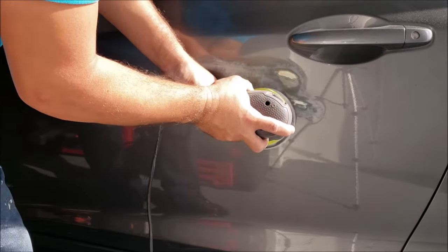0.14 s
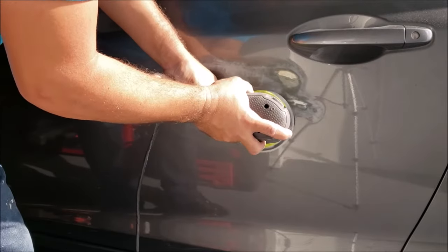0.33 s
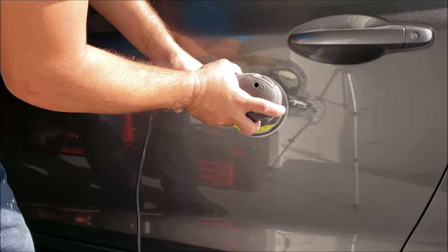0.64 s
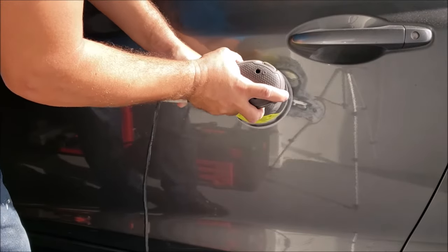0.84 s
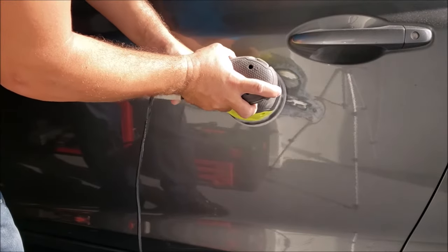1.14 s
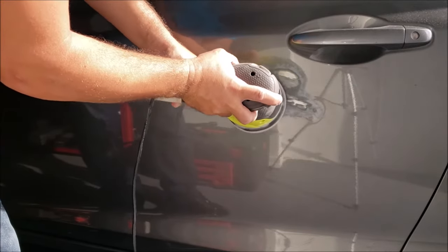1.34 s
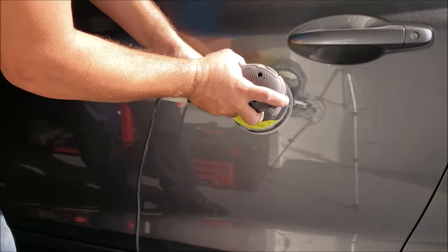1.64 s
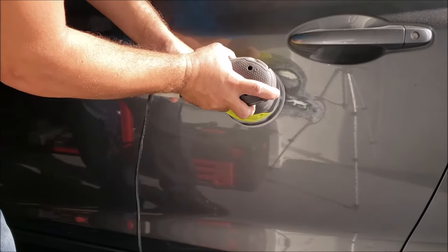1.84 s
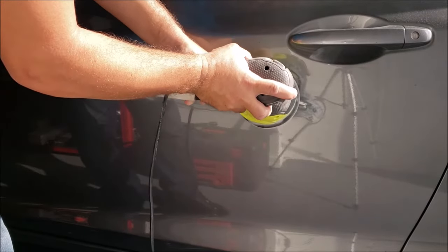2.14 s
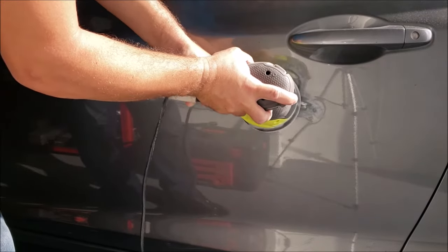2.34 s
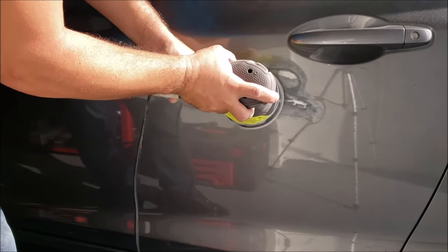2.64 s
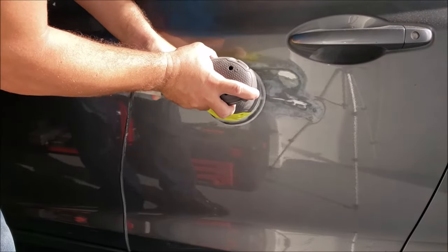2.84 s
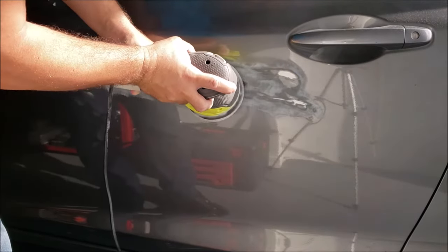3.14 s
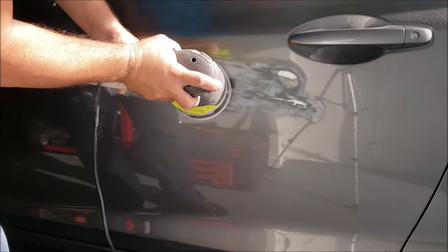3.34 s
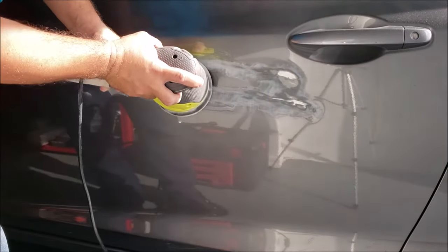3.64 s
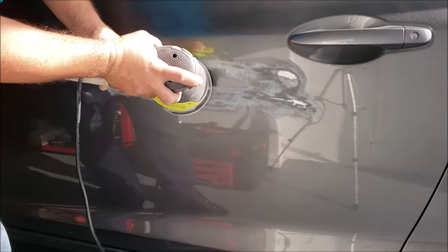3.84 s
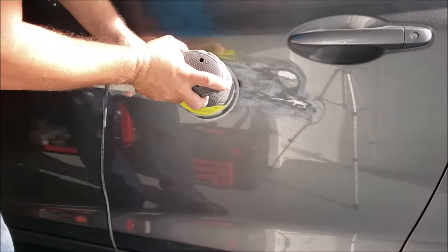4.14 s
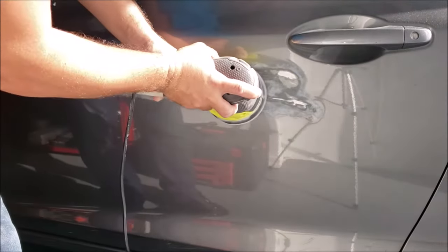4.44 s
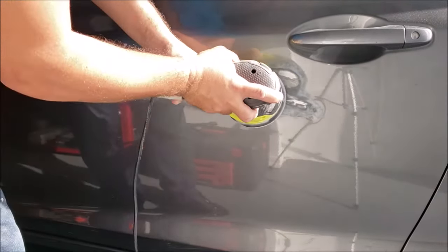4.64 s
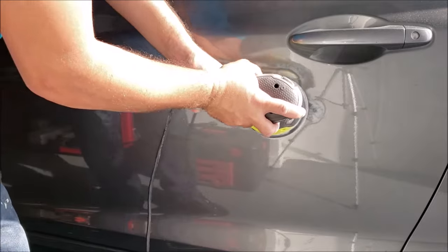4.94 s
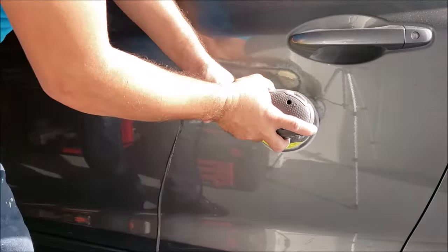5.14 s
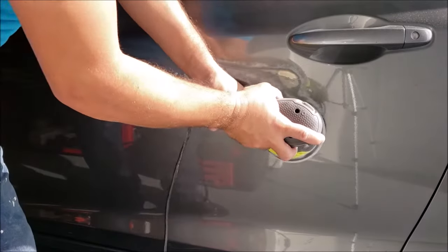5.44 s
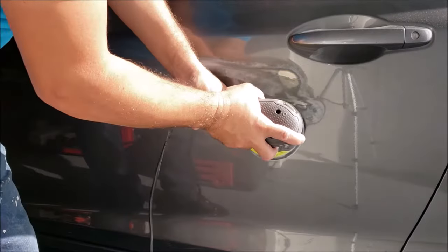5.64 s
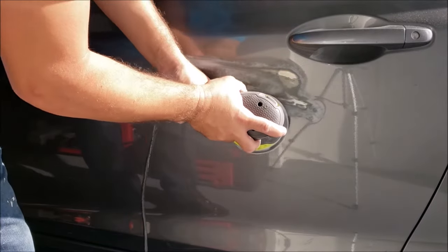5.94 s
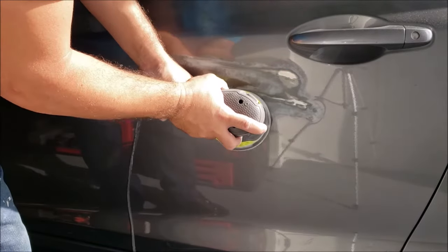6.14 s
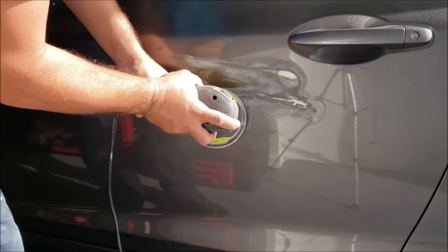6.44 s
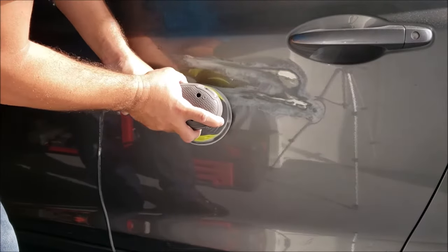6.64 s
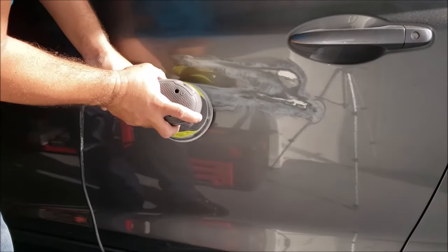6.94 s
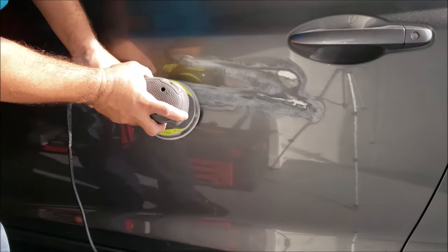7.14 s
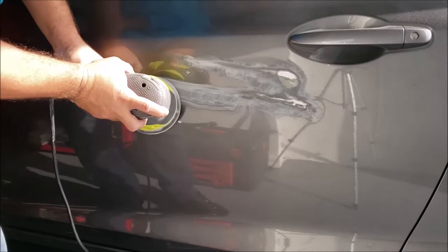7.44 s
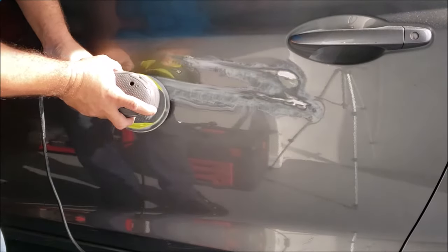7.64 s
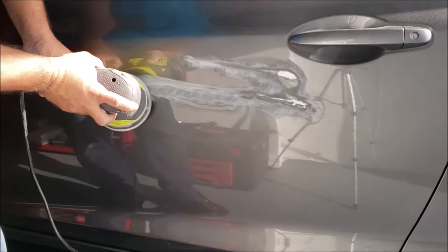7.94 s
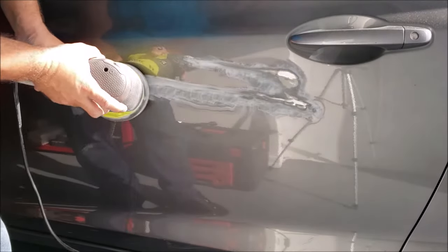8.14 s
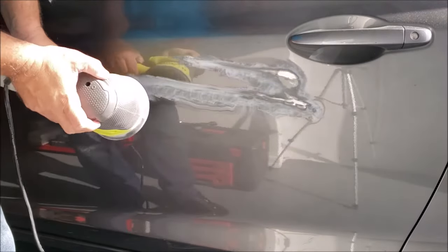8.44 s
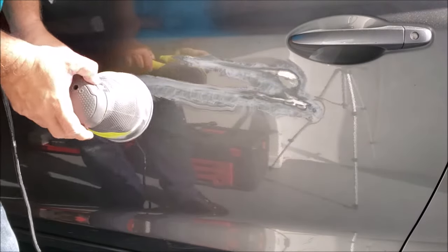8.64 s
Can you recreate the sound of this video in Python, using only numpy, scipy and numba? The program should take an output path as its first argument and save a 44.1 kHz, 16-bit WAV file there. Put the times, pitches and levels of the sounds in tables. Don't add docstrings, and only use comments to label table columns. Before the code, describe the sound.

A hand sander works on a painted metal panel, heard close in stereo with the tool leaning slightly left. Constant buzzing hum, metallic overtones that swell and fade, fan air and dry abrasive hiss continue throughout. Soft rhythmic knocks colour the first two seconds. After about eight seconds it leaves the door, sounding lighter and airier, pitch edging up before a final sag; a light breeze rumbles low.

```python
import sys
import numpy as np
from scipy import signal
from scipy.fft import rfft, irfft, next_fast_len
from scipy.io import wavfile
from scipy.ndimage import uniform_filter1d
from numba import njit

SR = 44100
rng = np.random.default_rng(int(sys.argv[2]) if len(sys.argv) > 2 else 0)


def attenuation_scalar(level_db):
    decades = np.asarray(level_db, float) / 20
    return 10 ** decades


def master(y):
    cut = np.clip(np.atleast_2d(y).T, -1, 1)
    pcm = np.round(cut * 32767)
    wavfile.write(sys.argv[1], SR, pcm.astype(np.int16))


N = 387626
SIZE = next_fast_len(N, True)
FREQ = np.maximum(np.fft.rfftfreq(SIZE, 1 / SR), 1)
STEP = 64
SLOW = np.arange(N // STEP + 2) * STEP / SR
SIDES = np.array([[.5], [-.5]])
LIFT_S, LIFT_FADE_S = 8.04, .06


def curves(table):
    s, *columns = np.transpose(table)
    return [np.interp(SLOW, s, c) for c in columns]


def colour(points, hz=FREQ):
    at, value = np.transpose(points)
    return np.interp(np.log(hz), np.log(at), value)


def fine(slow):
    return np.interp(np.arange(N) / SR, SLOW, slow)


def walk(rate):
    k = max(int(SR / STEP / rate), 1)
    held = rng.standard_normal(1000)[np.arange(len(SLOW)) // k]
    return 1.3 * uniform_filter1d(uniform_filter1d(held, k), k)


def plateau(start, length, edge_s):
    inside_s = np.minimum(SLOW - start, start + length - SLOW)
    return np.clip(.5 + inside_s / edge_s, 0, 1)


def bumps(table):
    return sum(height * np.exp(-((SLOW - s) / half) ** 2) for s, half, height in table)


@njit
def spin_out(angle, swing, step):
    out = np.empty((2, len(angle)))
    for i in range(len(angle)):
        j, part = i // step, (i % step) / step
        turn = np.exp(1j * angle[i])
        for side in range(2):
            now = swing[side, j] + part * (swing[side, j + 1] - swing[side, j])
            out[side, i] = (turn * now).imag
    return out


def tone(angle, db, lean_db, lead, drift=0):
    loss = np.abs(np.cosh(lean_db * np.log(10) / 40 + .5j * lead))
    size = np.sqrt(2) * attenuation_scalar(db + SIDES * lean_db) / np.maximum(loss, .5)
    swing = size * np.exp(1j * (SIDES * lead + drift))
    return spin_out(angle, swing, STEP)


def port_noise(gain, alike):
    common, differ = rfft(rng.standard_normal((2, SIZE)))
    alike = np.clip(alike, 0, 1)
    shared = np.sqrt(1 + alike) * common
    apart = 2 * SIDES * np.sqrt(1 - alike) * differ
    pair = gain * (shared + apart)
    return pair / np.std(irfft(pair.mean(axis=0), SIZE))


# (time [s], speed [Hz])
SHAFT_SPEED = [(0, 205.9), (.35, 206.5), (1.3, 206.3), (1.9, 205.2), (2.7, 204.6), (3.4, 204.8),
               (3.9, 205.5), (4.7, 204.7), (5.3, 206.6), (5.65, 207.1), (6.0, 206.4), (6.5, 205.4),
               (7.4, 205.7), (7.82, 205.5), (8.1, 207.5), (8.42, 210.1), (8.645, 210.8), (8.79, 197.5)]


def shaft_angle():
    speed_hz = curves(SHAFT_SPEED)[0] * (1 + 0.0007 * walk(10))
    return 2 * np.pi * np.cumsum(fine(speed_hz)) / SR


# (time [s], strength [1 = full knock])
PAD_KNOCKS = [
    (0.0, .7),
    (.27, 1),
    (.56, .75),
    (.8, 0.4),
    (1.03, 1.05),
    (1.3, 1.1),
    (1.55, 1.1),
    (1.9, 1),
    (2.1, .3),
    (2.3, .3),
]
KNOCK_CHANGE = {2: -6.5, 6: 1, 8: 16.5, 18: 5}


def knock_db(k):
    half_s = .08
    return KNOCK_CHANGE.get(k, 0) * bumps([(s, half_s, strength) for s, strength in PAD_KNOCKS])


# (time [s], length [s], multiple of the shaft, level [dB])
DOOR_ANSWERS = [(.75, 1.77, 3, -57), (2.85, .6, 3, -56.5), (3.4, 0.94, 3, -53), (4.35, 0.58, 3, -58),
                (5.2, 0.75, 3, -61.5), (6.3, 0.91, 3, -59), (8.2, 0.67, 3, -60), (-.1, 0.19, 4, -54),
                (.3, 1.2, 4, -56.5), (1.55, .7, 4, -61), (2.5, 0.53, 4, -61), (3.3, 0.81, 4, -57),
                (4.25, 0.36, 4, -65), (5.7, 0.61, 4, -62.5), (6.45, 0.6, 4, -58.5), (7.15, 0.58, 4, -58.5),
                (-.2, .32, 6, -51), (.22, 1.14, 6, -51.5), (1.45, 0.76, 6, -53.5), (2.55, .5, 6, -50),
                (2.3, .25, 6, -55.5), (3.3, 1.2, 6, -67), (4.3, .65, 6, -55.5), (5.0, .3, 6, -60),
                (5.65, 0.76, 6, -54.5), (6.4, .5, 6, -61)]
# (time [s], length [s], multiple of the shaft, level [dB])
RIM_RATTLES = [(-.1, 1.85, 2, -56.5), (1.92, .1, 2, -56.5), (2.15, 0.092, 2, -60), (2.75, 1.03, 2, -64),
               (3.95, .65, 2, -58.5), (4.65, .35, 2, -66), (5.5, 1.75, 2, -64), (7.6, .3, 2, -61),
               (8.0, .45, 2, -62), (8.68, 0.11, 2, -62), (2.45, 0.51, 8, -58.5), (3.95, 0.68, 8, -60),
               (4.9, .25, 8, -60), (5.9, .7, 8, -65), (8.4, 0.46, 8, -62.5), (-.1, 0.81, 9, -64),
               (.8, .77, 9, -59), (3.2, 0.95, 9, -65.5), (5.05, .25, 9, -65), (6.5, 0.92, 9, -67.5),
               (7.86, 0.23, 9, -61), (8.3, 0.27, 9, -64), (8.6, .3, 9, -60.5)]


def swell_db(k, rest_db):
    power = attenuation_scalar(rest_db) ** 2
    for start, length, multiple, db in list(DOOR_ANSWERS) + list(RIM_RATTLES):
        if multiple == k:
            power = power + attenuation_scalar(db) ** 2 * plateau(start, length, 0.23) ** 2
    return 10 * np.log10(power) + knock_db(k)


# (time [s], hum level [dB], left minus right [dB])
PANEL_HUM = [(0.0, -41.5, 4.6), (0.19, -44, 4.0), (.7, -42, 2.6), (1.3, -40.5, 2.5), (1.9, -42.5, 1.8),
             (2.47, -44, 2.4), (2.91, -39.5, 1.0), (4.21, -39.5, 0.5), (4.84, -44.5, 2.0), (5.34, -46, 5),
             (6.0, -43.6, 4.5), (6.75, -43, 4.5), (7.6, -41, 3.2), (7.84, -43, 3), (8.01, -51, 2.0),
             (8.35, -49.5, 3.7), (8.72, -53, 3), (8.79, -61, -2.5)]
# (multiple of the shaft, level [dB], change once lifted [dB])
STRONG_REST = [(2, -69, -6), (3, -64.5, 1.5), (4, -66, -9), (6, -66, -4), (8, -70, 1), (9, -69, -2)]
# (multiple of the shaft, left minus right [dB], left leads by [rad])
STRONG_STEREO = [(1, -0.5, 0.95), (2, 4, 0.4), (3, 6, 1), (4, 10.5, .6), (6, 5.5, -0.045), (8, 13, -2),
                 (9, 9, 1)]


def panel_hum_and_rim(angle):
    hum, pan_db = curves(PANEL_HUM)
    lifted = plateau(LIFT_S, 9, LIFT_FADE_S)
    levels = [hum]
    levels += [swell_db(k, db + lifted_db * lifted) for k, db, lifted_db in STRONG_REST]
    out = 0
    for db, (k, lean_db, lead) in zip(levels, STRONG_STEREO):
        if k > 1:
            lean_db = lean_db + 1.7 * walk(1.63)
            lead = lead + .3 * walk(1.2)
            flutter_db = 1.66 * walk(16) + .4 * walk(5)
            drift = k + 0.49 * walk(26)
        else:
            lean_db = lean_db + pan_db
            flutter_db = 0.35 * walk(11) + 0.4 * walk(45) + 0.26 * walk(4)
            drift = 0
        out = out + tone(k * angle, db + flutter_db, lean_db, lead, drift + 0.032 * walk(40))
    return out


# (frequency [Hz], left minus right [dB])
PORT_LEAN = [(60, 3), (200, 1), (380, 3), (700, 4), (1290, 5), (2380, 8), (6000, 11.5), (7300, 8),
             (7800, 6), (11700, 3.5), (12800, 5), (15700, 11)]
# (multiple of the shaft, level [dB])
WHINE_REST = [(5, -77), (7, -71.5), (10, -72.5), (11, -69), (12, -69), (13, -83), (14, -85), (15, -75.5),
              (16, -74), (17, -70), (18, -72), (19, -77), (20, -83), (21, -76), (22, -73), (23, -83),
              (24, -72), (25, -73.5), (27, -77.5), (28, -81), (29, -72.5), (31, -83), (36, -77), (47, -80),
              (48, -84)]
# (time [s], length [s], multiple of the shaft, level [dB])
DOOR_SINGS = [(-0.1, .68, 18, -62), (0.0, 0.89, 12, -65.5), (5.5, .6, 36, -70), (0.5, 2.34, 24, -63),
              (-0.5, 0.61, 48, -69), (0.58, 1.41, 10, -64), (2.0, 1.6, 17, -65.5), (2.5, 0.79, 14, -69),
              (2.7, 0.68, 12, -61.5), (2.51, 0.3, 7, -60), (2.5, .65, 5, -66), (2.95, 0.4, 21, -66),
              (3.25, 0.41, 24, -64), (3, 0.5, 22, -65), (3.5, 0.76, 19, -65), (3.5, 0.7, 14, -66),
              (3.5, 1.4, 7, -62.5), (5.5, .55, 5, -67), (4.35, 0.68, 17, -67), (4, 1.5, 18, -65.5),
              (6.5, 1.26, 5, -65), (5.5, 1.5, 17, -65.5), (5.5, 1.7, 14, -62), (5, 0.75, 10, -61),
              (6.5, .95, 13, -69), (7, .5, 15, -66), (6.4, 0.5, 11, -65), (7.3, 0.56, 19, -60.5),
              (7, 1.1, 18, -61.5), (7, 0.55, 21, -62)]
# (time [s], length [s], multiple of the shaft, level [dB])
FREE_MOTOR_SINGS = [(7.9, .2, 7, -58.5), (8.1, .2, 18, -67), (8.13, 0.26, 14, -63), (8.33, 0.27, 11, -60),
                    (8.1, .2, 11, -65), (8.3, 0.43, 21, -65), (8.38, .22, 16, -63), (8.35, .25, 10, -64),
                    (8.66, .1, 10, -61), (8.3, .25, 12, -66), (8.5, 0.39, 7, -58.5), (8.25, .4, 13, -66),
                    (8.35, .2, 20, -68), (7.9, .2, 15, -64)]
# (time [s], turn rate [Hz], throb depth [dB])
PAD_SPIN = [
    (0, 3.44, 2.2),
    (2.2, 3.35, 2),
    (3.5, 2.54, 1.2),
    (8.79, 3.1, 2.7),
]


def whine(angle):
    spin_hz, throb_db = curves(PAD_SPIN)
    spin = 2 * np.pi * np.cumsum(spin_hz) * STEP / SR
    out = 0
    for k, rest_db in WHINE_REST:
        power = attenuation_scalar(rest_db + 0.95 * walk(2.54)) ** 2
        for start, length, multiple, sing_db in list(DOOR_SINGS) + list(FREE_MOTOR_SINGS):
            if multiple == k:
                power = power + attenuation_scalar(sing_db - 3.5) ** 2 * plateau(start, length, 0.2)
        throb = throb_db * (np.cos(spin + 7 * rng.random()) - .3)
        db = 10 * np.log10(power) + throb + knock_db(k) + 2.52 * walk(14)
        lean_db = colour(PORT_LEAN, 206 * k) + 0.7 * walk(1.23)
        out = out + tone(k * angle, db, lean_db, 1.77 * walk(1.353), k + 1.06 * walk(9))
    return out


def reflections():
    lag_s = .001 + .02 * rng.random((2, 7, 1))
    treble = np.clip(FREQ / 4000 - .5, 0, 1)
    comb = 1 + attenuation_scalar(-13.0) * treble * np.exp(-2j * np.pi * FREQ * lag_s).sum(axis=1)
    return comb / np.sqrt(uniform_filter1d(np.abs(comb) ** 2, SIZE // 40))


# (frequency [Hz], width [Hz], level over the hiss [dB])
DOOR_MODES = [(267, 24, -3.5), (552, 28, 2), (585, 12.2, 13), (670, 42, -3.5), (822, 41, 4), (920, 13, -3),
              (950, 11, -5.5), (1026, 4.4, -13), (1210, 85, -7), (1260, 130, -14), (1516, 27, -10),
              (2025, 61, -10)]


def door_skin():
    return 1 + sum(attenuation_scalar(db) / (1 + ((FREQ - hz) / width) ** 2) for hz, width, db in DOOR_MODES)


# (frequency [Hz], density [dB per Hz])
HISS_COLOUR = [(40, -27), (150, -6), (330, -9.5), (470, -7.5), (720, -6), (1250, -2.5), (1700, -6.5),
               (2300, -4.5), (4000, -8.5), (7100, -8), (7700, -15), (9100, -16), (11500, -9),
               (15700, -12.5)]
# (frequency [Hz], likeness [0-1])
PORT_LIKENESS = [(60, 0.07), (600, 0.36), (1400, 0.44), (3100, 0.2), (6800, 0)]
# (time [s], fan level [dB], scrub re its mean [dB])
HAND_GRIP = [
    (0, -55, -2),
    (.5, -55.2, 2.5),
    (2.0, -56, 1.5),
    (2.4, -56, -1.5),
    (2.7, -56, 1),
    (3.8, -57.4, 0.1),
    (5.5, -56.5, 3),
    (6.5, -56, 0.5),
    (7.3, -56, -2.1),
    (8.79, -56.5, -4.5),
]
# (time [s], half length [s], change [dB])
GRIT_SKIPS = [
    (3.42, 0.066, -3),
    (5.27, .04, -4),
    (5.51, .09, -4),
    (5.86, .04, -2.5),
]


def hiss(angle):
    fan_db, scrub_db = curves(HAND_GRIP)
    lifted = plateau(LIFT_S, 9, LIFT_FADE_S)
    pair = port_noise(attenuation_scalar(colour(HISS_COLOUR)) * door_skin(), colour(PORT_LIKENESS))
    pair = pair * attenuation_scalar(SIDES * colour(PORT_LEAN)) * reflections()
    scrub_db = scrub_db - 1 * lifted
    grit_db = .6 * (-55 - fan_db) - 6 * lifted + bumps(GRIT_SKIPS) + 0.29 * walk(9)
    out, place = 0, 1.5 * np.log2(FREQ / 60)
    for band in range(14):
        hz = 60 * 2 ** (band / 1.5)
        share = np.cos(np.pi / 2 * np.clip(place - band, -1, 1)) ** 2
        scrub = colour([(250, 0.072), (700, 0.0), (1300, 1.0), (2400, 0.0)], hz)
        grit = colour([(6000, 0.025), (9600, 0.7), (15000, 1.05)], hz)
        flicker_db = (1.02 - .8 * grit) * walk(5) + 0.62 * walk(18)
        db = fan_db + 5.0 + scrub * scrub_db + grit * grit_db + flicker_db
        out = out + fine(attenuation_scalar(db)) * irfft(pair * share, SIZE)[:, :N]
    return out * (1 + 0.013 * np.cos(angle + 0.31))


# (frequency [Hz], density [dB])
GUST_COLOUR = [(20, -20), (38, -1), (62, 3.5), (90, -3.5), (150, -6), (260, -28.5)]
# (time [s], length [s], level [dB])
WIND_PUFFS = [
    (-.2, 1.43, -63.5),
    (5.0, 0.14, -73),
    (7.383, .1, -73),
    (7.9, 0.37, -74),
    (8.398, .6, -63),
]


def breeze():
    calm_db, edge_s = -79, .08
    gust = irfft(port_noise(attenuation_scalar(colour(GUST_COLOUR)), .85), SIZE)[:, :N]
    power = attenuation_scalar(calm_db) ** 2
    for start, length, db in WIND_PUFFS:
        power = power + attenuation_scalar(db) ** 2 * plateau(start, length, edge_s) ** 2
    return gust * fine(np.sqrt(power) * attenuation_scalar(1.0 + 0.91 * walk(5.8)))


def scene():
    angle = shaft_angle()
    return panel_hum_and_rim(angle) + whine(angle) + hiss(angle) + breeze()


def band_limit(x):
    return signal.sosfilt(signal.butter(12, 16850, fs=SR, output="sos"), x)


def record(dry):
    top_hz = 15720
    mix = irfft(rfft(dry, SIZE) * (FREQ < top_hz), SIZE)[:, :N]
    return band_limit(mix)


dry = scene()
out = record(dry)
master(out)
```